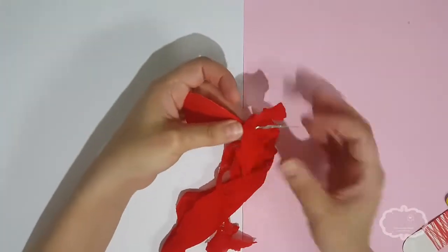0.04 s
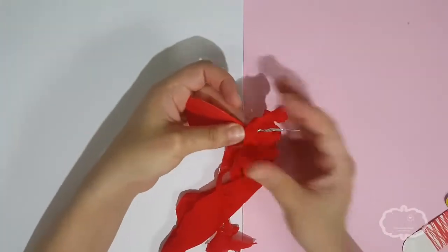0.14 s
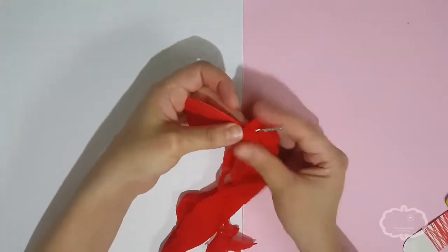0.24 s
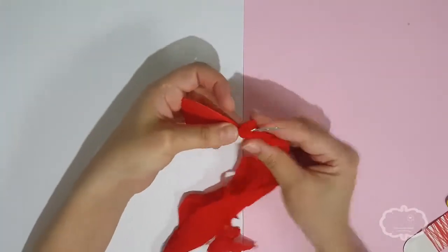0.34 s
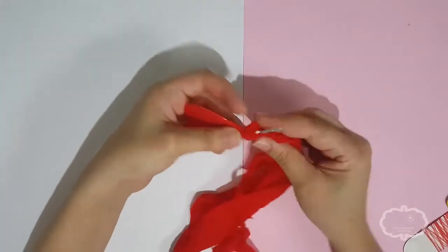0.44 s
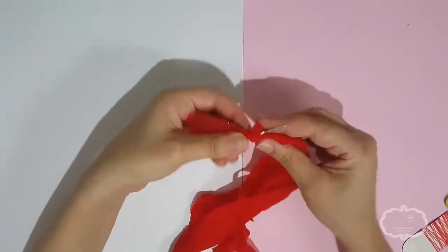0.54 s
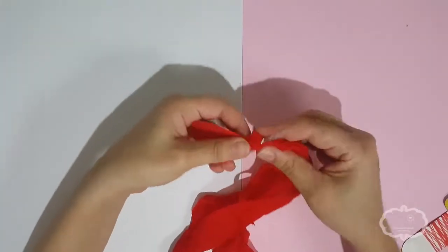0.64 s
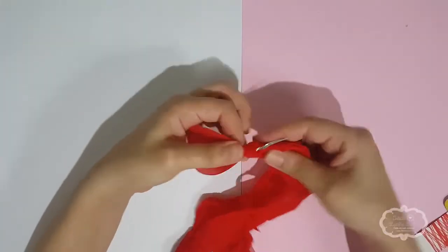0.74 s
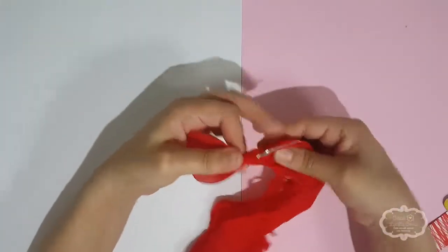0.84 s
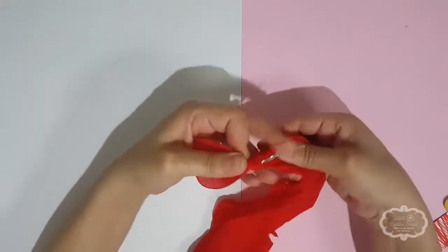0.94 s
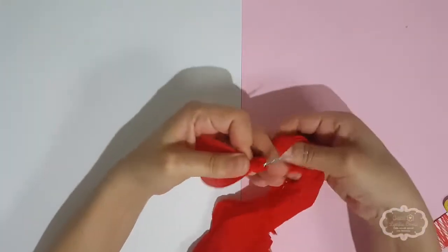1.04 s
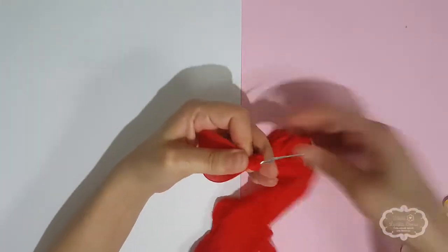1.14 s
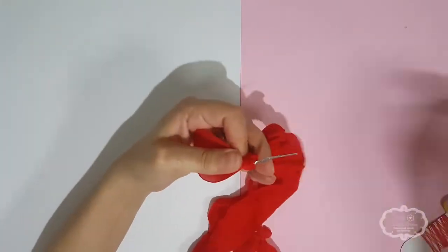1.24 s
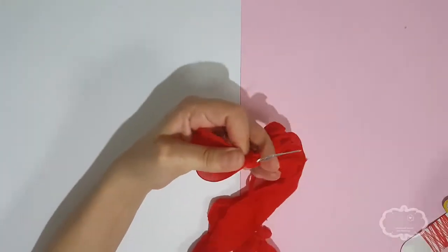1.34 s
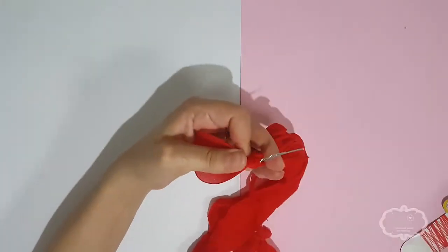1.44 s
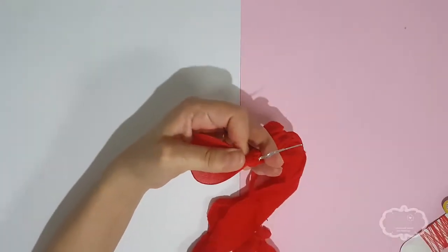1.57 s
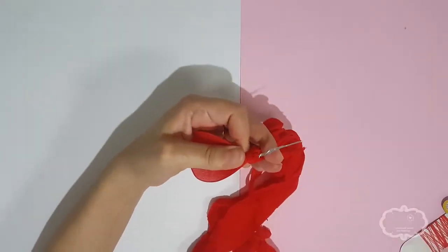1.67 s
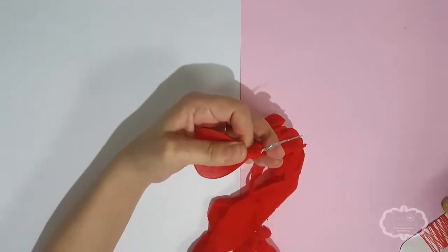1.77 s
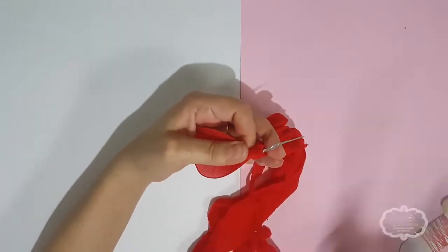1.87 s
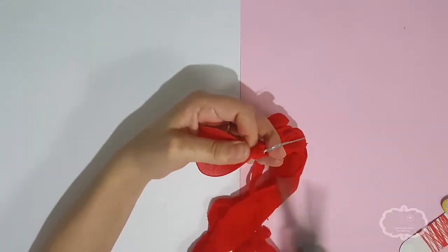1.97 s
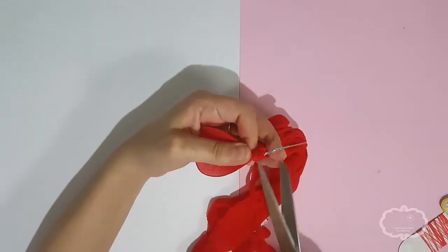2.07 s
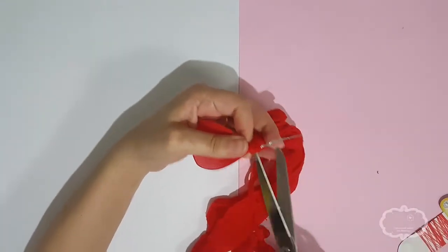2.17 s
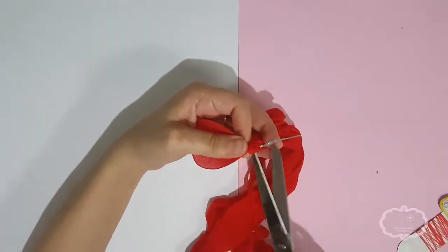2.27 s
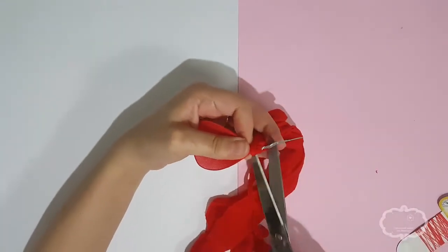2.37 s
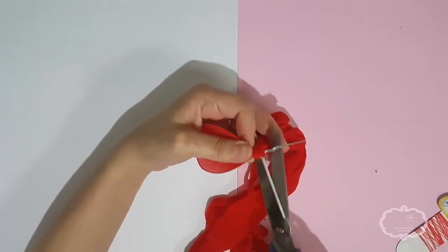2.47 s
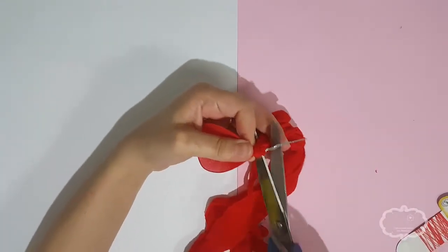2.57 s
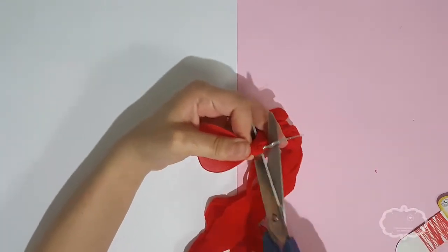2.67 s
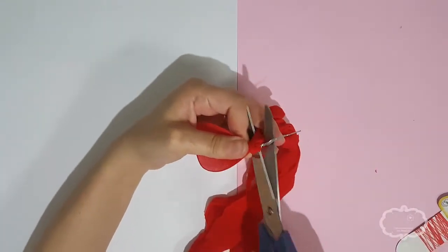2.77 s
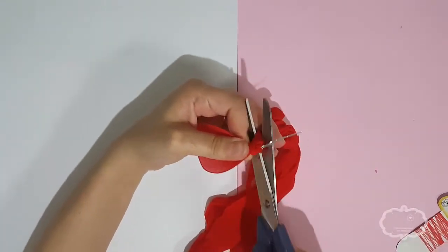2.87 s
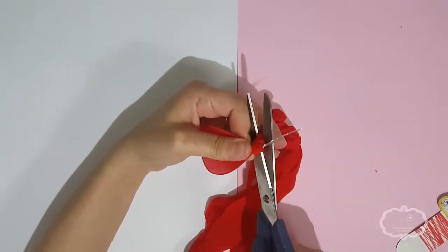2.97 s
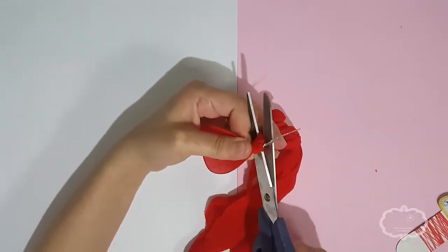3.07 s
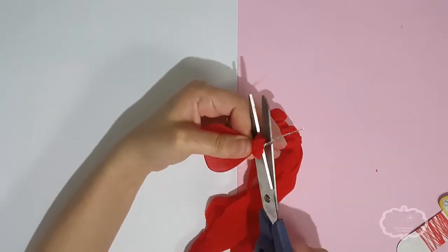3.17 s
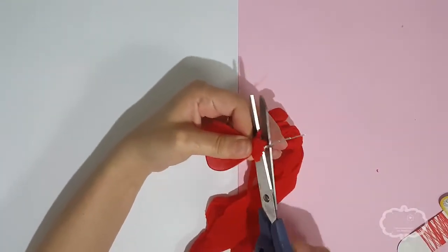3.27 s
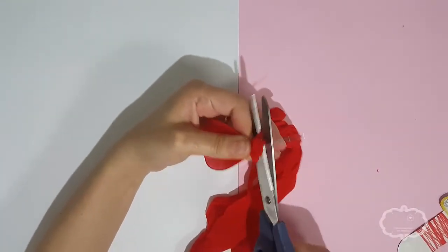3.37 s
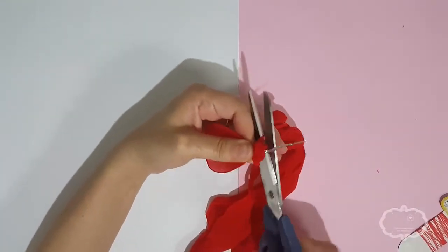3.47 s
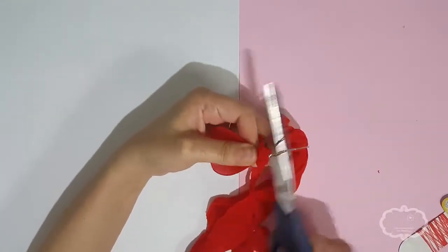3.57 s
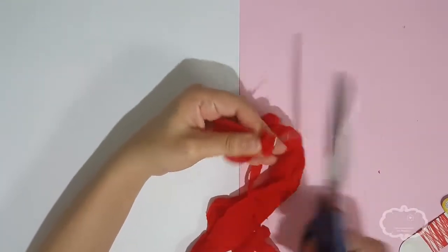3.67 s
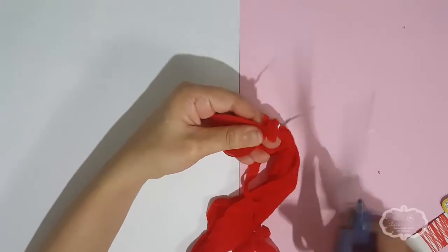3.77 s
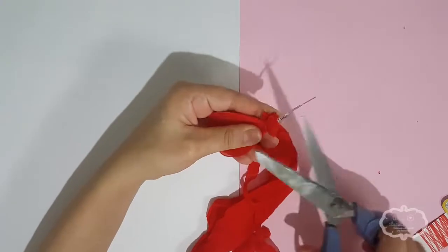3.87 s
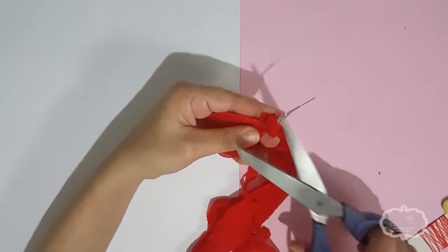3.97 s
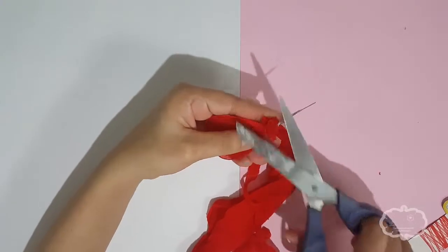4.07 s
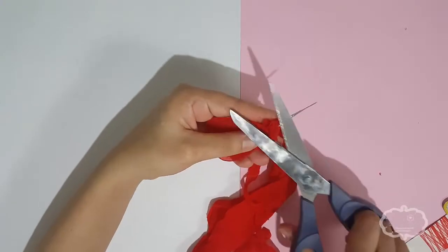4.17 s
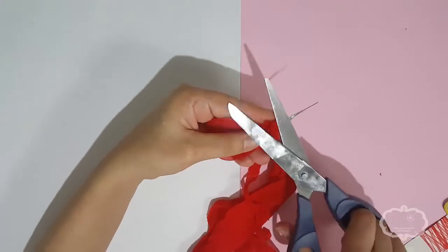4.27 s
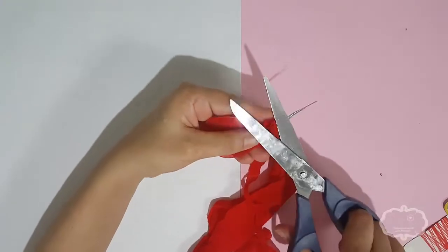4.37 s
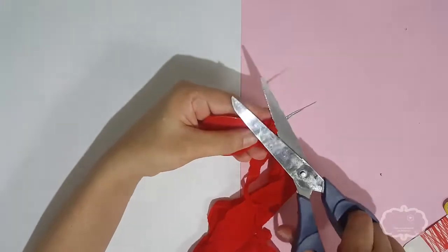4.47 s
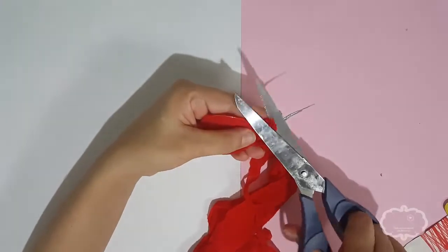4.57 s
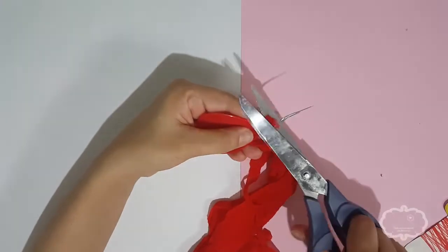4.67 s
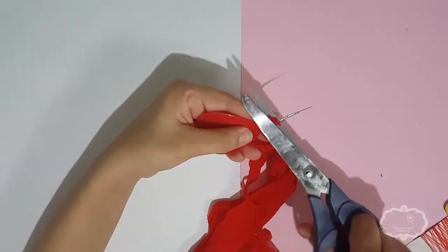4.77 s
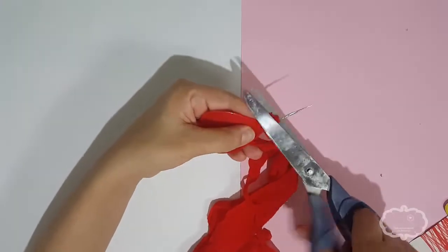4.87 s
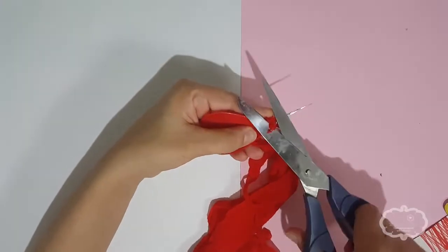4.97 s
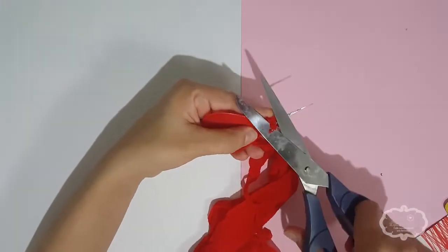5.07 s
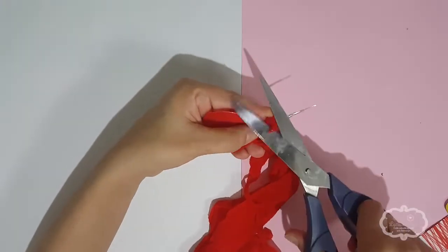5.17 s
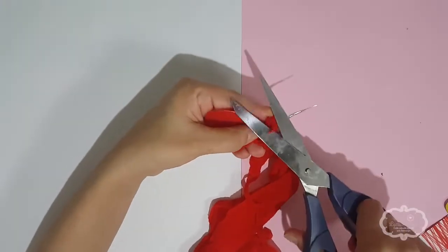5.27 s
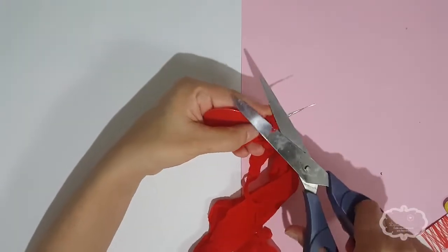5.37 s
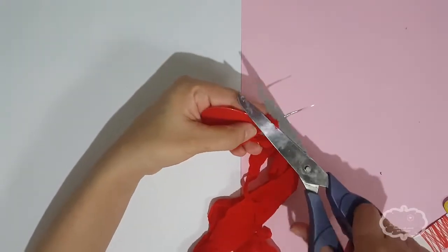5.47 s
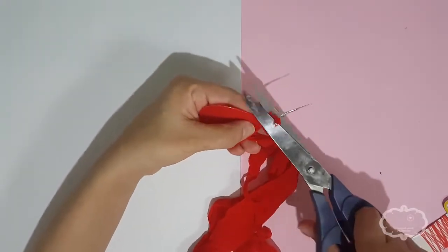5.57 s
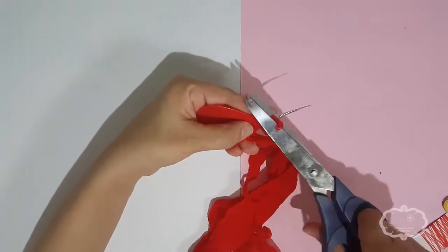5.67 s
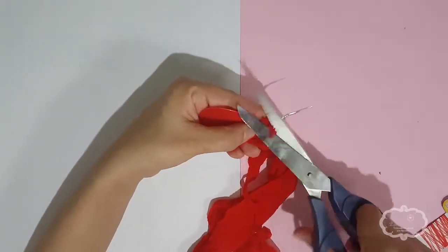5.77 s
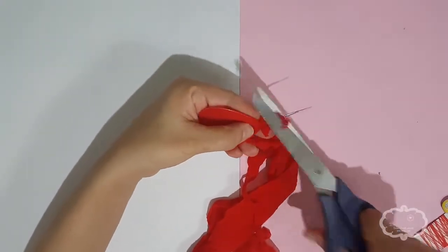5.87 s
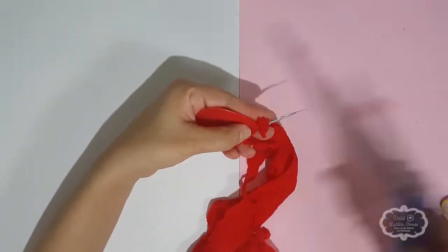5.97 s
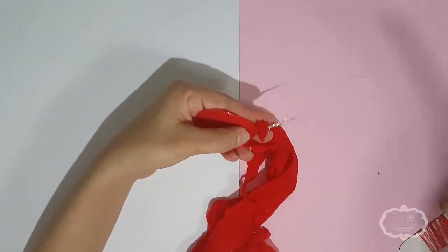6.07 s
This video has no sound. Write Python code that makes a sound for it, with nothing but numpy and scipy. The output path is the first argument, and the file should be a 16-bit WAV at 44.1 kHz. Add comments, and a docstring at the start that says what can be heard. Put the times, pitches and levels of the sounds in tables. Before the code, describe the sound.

Dull table knocks and a sharp metal clack, then scattered scissor snips in softly rustling fabric over a low room hum.

```python
"""Steel scissors on a craft table in a small hard room: picked up with dull knocks on the table top, they click,
scrape and snap shut through cloth. Cloth rustles in the hands; a low hum and rumble waver under the room's hiss."""
import sys
import numpy as np
from scipy import signal
from scipy.fft import rfft, irfft, next_fast_len
from scipy.io import wavfile
from scipy.ndimage import uniform_filter1d, map_coordinates

SR = 44100
rng = np.random.default_rng(int(sys.argv[2]) if len(sys.argv) > 2 else 0)


def master(y):
    """Save y as 16-bit WAV."""
    cut = np.clip(np.atleast_2d(y).T, -1, 1)
    pcm = np.round(cut * 32767)  # scale
    wavfile.write(sys.argv[1], SR, pcm.astype(np.int16))


N = 270487

# contacts of the steel: (s, peak dB, handle Hz, handle dB, pivot Hz, pivot dB, blade Hz, blade dB,
# tip Hz, tip dB, crack dB, left-right dB, room dB)
CLICKS = [(0.775, -40.5, 1078, -15, 2164, -4, 4390, -26, 12100, -34, -20.5, -2.5, -6.5),
          (1.688, 1, 1212, -29, 2512, -10, 4430, -15, 7774, -11, -7, 1, -2.5),
          (1.447, -40, 1560, -25, 2270, -17, 6340, -8.5, 7960, -22, -20.5, -4.5, -8),
          (1.843, -25.5, 1732, -33.5, 2409, -11, 4488, -10, 12420, -15.5, -3.5, 0, 9),
          (1.857, -23.5, 1701, -15, 2524, -9, 4790, -14, 9860, -12, -4, 4, 5.5),
          (3.226, -31, 851.1, -39, 2025, -11.5, 3794, -18, 8630, -33.5, -15.5, 3.5, -6.5),
          (3.249, -21, 732, -28, 1948, -5.5, 6300, -34, 10500, -1.5, -30.5, -2, -10.5),
          (3.44, -25.5, 907, -26.5, 2069, -11.5, 6285, -33, 13900, -21, -32.5, 0.5, -8),
          (3.556, -42, 1640, -17.5, 2130, -18, 6410, -37.5, 12270, 0, -37, 10.5, -1),
          (3.564, -34, 1421, -7.5, 2170, -8, 6450, -26, 14600, -29, -33, 3, -0.5),
          (3.6, -38, 1313, -3.5, 2060, -1, 3880, -34, 8740, -20, -23.5, 1, -18.5),
          (3.695, -9.5, 1681, -22, 2142, -4, 6260, -13.5, 7705, -11.5, -12, 9, -7.5),
          (3.75, -26.5, 1355, -7.5, 2180, -27.5, 4090, -14.5, 12380, 0, -21.5, 6.5, -1),
          (4.175, -43, 1300, -19.5, 2310, -12.5, 6200, -17.5, 12200, -24.5, -12, -0.5, -4.5),
          (4.727, -32.5, 1711, -26, 1961, -10.5, 3864, -26.5, 12700, -5, -7, 1.5, -5),
          (4.964, -23, 897, -4, 1857, -13, 4375, -4.5, 12550, -1, -21.5, -2, -18.5),
          (5.602, -30, 1647, -21.5, 1949, -10, 6406, -14, 10520, 1, -10.5, 0.5, -8.5),
          (5.622, -33.5, 656, -9, 2253, -8, 6200, -26, 13600, -18, -11, 2, -2),
          (5.776, -48, 1616, 0.5, 1980, -6, 3870, -31, 8830, -21, -30, -3, -4),
          (5.792, -20, 1680, -8.5, 1880, -21, 4300, -20, 8899, -1.5, -28.5, -4.5, -28.5),
          (5.799, -26.5, 1113, -3.5, 2093, -3.5, 3850, -12, 8950, 0.5, -18, -4.5, -25),
          (5.9988, -3.5, 1531, -12, 2207, -12.5, 3730, -18.5, 8986, -13.5, -12.5, -4, -14),
          (5.997, -1.5, 1441, -17.5, 2504, -14, 3730, -26, 8720, -14.5, -10.5, -2, 0),
          (6.014, -23, 1132, -9.5, 2081, -2, 5070, -9, 8060, -21, 5, 8.5, 2),
          (6.087, -18, 769.4, -12, 2336, -22, 6400, -22.5, 12700, -4.5, -7.5, -5, 1.5)]
# the scissors' modes, damped by the hand, by part: (Hz, dB, t60 s)
PIVOT = [(1870, 4.5, 0.006), (2125.3, 6.5, 0.01062), (2324, 6, 0.0091), (2753, 2.5, .008)]
BLADE = [(3870, 0, .007), (4400, 0, .004), (5070, 0, .007), (6300, 0, .005)]  # fixed
TIP = [(7911, -1, 0.0021), (8738, 2.5, 0.0049), (10666, -2, 0.0018), (12036, 0.5, 0.001716), (13270, -1.5, 0.0026), (16400, -10.5, 0.002)]
# strokes of the blades on each other and through cloth:
# (s of the peak, rise s, fall s, handle dB, lower pivot dB, upper pivot dB, edge dB, singing dB)
SLIDES = [(1.16, 0.0447, 0.066, -65.5, -59, -61, -75.5, -78.5),
          (1.246, 0.075, 0.048, -87.5, -84.5, -85, -77, -68.5),
          (1.7, .008, 0.123, -32, -38, -25.5, -28.5, -52.5),
          (1.864, 0.02126, 0.0877, -42.5, -62.5, -30, -28.5, -55.5),
          (3.23, 0.1072, 0.0123, -78, -48.5, -49.5, -57.5, -57),
          (3.245, 0.0062, 0.0162, -76, -49.5, -42, -52.5, -70.5),
          (3.262, .01, 0.0745, -76, -60, -60, -50, -60.5),
          (3.438, 0.0195, 0.0066, -66.5, -53, -71, -66, -75.5),
          (3.564, 0.0477, 0.078, -55.5, -41.5, -55.5, -55.5, -71),
          (3.692, 0.0156, .01, -51.5, -44.5, -53.5, -52.5, -67.5),
          (3.706, 0.0053, 0.0767, -50, -29, -37.5, -31, -47.5),
          (3.751, 0.0547, 0.1128, -41, -37, -33.5, -31.5, -55.5),
          (4.73, 0.0066, 0.0247, -64.5, -51, -59, -51.5, -54),
          (4.962, 0.019, 0.0072, -54.5, -42, -65, -45, -63.5),
          (4.976, 0.0071, 0.095, -63, -70.5, -54.5, -52, -60.5),
          (5.598, 0.12, 0.015, -66, -56, -64.5, -61, -73),
          (5.605, .008, 0.0206, -68.5, -51, -60.5, -47, -60.5),
          (5.79, 0.0091, 0.012, -65.5, -50, -75, -49, -41),
          (5.812, 0.041, 0.0608, -43, -35, -48.5, -45.5, -50.5),
          (5.915, 0.0652, 0.091, -50.5, -36, -46.5, -49, -63.5),
          (5.993, 0.0152, 0.0102, -34, -40, -58.5, -68.5, -69),
          (6.006, 0.0155, 0.119, -39, -44, -32, -34.5, -57.5),
          (6.096, 0.0127, 0.0554, -40, -42, -60.5, -42, -50)]
# knocks on the table: (s, peak dB, boom dB, board dB, panel dB, clack dB, length ms, room dB)
KNOCKS = [(1.424, -8, -13.5, -15.5, -21.5, -11, 2.22, 1.5), (1.446, -15, -2, -13.5, -23.5, -3, 2.554, 0),
          (1.468, -12, -22.5, -11.5, -18.5, -4, 0.375, 0), (1.484, -22.5, -21.5, -11, -32, -16, 1.2, -3.5),
          (1.595, -28, -11.5, -5.5, -28, -13, 4.66, -1.5), (1.621, -26, -6, -12.5, -10.5, -25.5, 4.2, -6.5), (1.63, -9.5, -16, -16, -2, -12, 2.2, 1), (1.66, -14.5, -6.5, -8, -11.5, -5, 2.36, 3.5),
          (1.689, -15, -21, -20, -23.5, -7, 4.18, 3)]
BOOM = [(89.76, -1.5, 0.18), (122, 1, 0.15)]  # table modes: (Hz, dB, t60 s)
BOARD = [(184.8, 0, 0.12), (305.8, -5, 0.14), (352, -6, 0.15)]
CLACK = [(410, -2, .016), (481, -0.5, .016), (560, 0.5, .014), (660, 0.5, .014), (735, -1, .012), (810, -2.5, .011), (920, -4, .01),
         (1040, -4, .008), (1257, -4, .008), (1430, -7, .007), (1618, -8, .006), (1903, -10, .006), (2150, -8.5, .008)]  # fixed
LOWS = [(0.0, -67, -53), (0.36, -49, -47.5), (0.39, -57.5, -64.5), (0.53, -55, -48.5), (0.65, -52, -54), (0.77, -58.5, -45.5),
        (0.94, -52.5, -47), (1.38, -50, -58), (1.43, -55.5, -50.5), (2.01, -56.5, -59.5), (2.24, -53, -52.5), (2.42, -58.5, -58.5),
        (3.09, -60.5, -43.5), (3.23, -57.5, -62), (4.28, -57.5, -46), (4.59, -60, -61.5), (5.16, -61, -48), (5.39, -55, -61),
        (5.86, -67.5, -55), (6.13, -74, -49)]  # (s, rumble dB, hum dB)
# throbs of a rough drone: (s of the peak, rise s, fall s, dB)
DRONE = [(.03, 0.116, 0.074, -37), (.096, 0.0426, 0.037, -31), (.16, 0.131, 0.153, -33), (.3, 0.112, 0.049, -53.5), (.514, 0.33, 0.332, -48),
         (.9, 0.477, 0.092, -56), (1.2, 0.96, 0.14, -56)]
DRONE_LOW, DRONE_UP = [(179.75, 40.9, 14.5), (297, 160, 2.5)], [(518, 37.3, 1.7), (779, 214, 3.27)]  # (Hz, width Hz, dB)
# brushes of the cloth: (s of the peak, rise s, fall s, dB)
RUSTLE = [(.236, .06, 0.063, -61), (.456, 0.165, 0.29, -64.5), (.88, 0.29, 0.354, -63), (1.15, 0.042, 0.1636, -64), (1.246, 0.081, 0.099, -64),
          (1.445, 0.0775, 0.149, -55), (1.631, 0.103, 1, -58.5), (2.55, 0.11, 0.043, -72.5), (2.952, 0.25, 0.129, -67),
          (4.66, 0.112, 0.49, -65.5), (4.862, 0.02, 0.032, -63.5)]
CLOTH = [(880, -26), (1500, -1.5), (1720, -6), (2780, -5.5), (3910, -9), (4480, -9.5), (6010, -8), (12500, -16),
         (15500, -37)]  # (Hz, dB per Hz)
AIR = [(0, -51), (1.2, -55), (2.1, -58), (3.5, -55.5), (4.4, -55.5), (4.9, -55), (6.13, -52.5)]  # room hiss: (s, dB)
HISS = [(59, -20.5), (100, -2.5), (153, -6.5), (182, -11.5), (256, -10.5), (303, -19), (383, -18), (426, -17.5), (653, -19.5),
        (1210, -27.5), (1700, -30.5), (2250, -28), (3200, -36), (5870, -41.5), (12500, -42), (16400, -50)]  # (Hz, dB per Hz)
ALIKE = [(60, .97), (200, .95), (550, .45), (1650, .08), (15000, .05)]  # (Hz, left-right likeness), fixed
ROOM = [(100, 0.709), (500, 0.291), (2200, 0.405), (6000, 0.33), (10000, 0.287), (14500, 0.12)]  # (Hz, t60 s)
TOP_HZ = 16500  # fixed
PANEL = [(254, 0, .13)]  # fixed
ROOM_ALIKE = [(200, .98), (600, .85), (1200, .1), (4000, -.15)]  # (Hz, left-right likeness of the walls' answer), fixed
MICROPHONE = [(12000, 0), (15500, -0.5), (16400, -24)]  # (Hz, dB)
HUSH_HZ = 71  # the table is too small to radiate below this
ROOM_COLOUR = [(100, -13.5), (400, 1), (900, -3.5), (2200, -1.5), (4200, -2.5), (7000, 0.5), (14000, -7.5)]  # (Hz, dB)
CLICK_MS, HARDENS = 0.965, 0.113  # length of a steel contact at -23 dB; dB shorter for each dB harder
NEAR_DB = 9  # the table's low modes reach the microphone mostly direct; fixed
SPOT = .05  # each knock lands elsewhere and shifts the clack by this share; fixed
CLICK_TAIL_SHARE = 0.714  # share of the room's decay time in the answer to each steel contact
SWELL_DB = 30  # a swell climbs this much in its rise time and sinks as much in its fall time; fixed
HUM_HZ, DRIFT_HZ, HUM_WAVER_DB = [64, 92, 122, 186, 252], 3, 2.5  # bands of the hum, their wander; fixed
CLIMB = [(.45, 29.12, -67), (.7, 30.05, -48), (.9, 32.15, -45.5), (1.05, 34.9, -59.5), (1.3, 38.54, -50), (1.901, 44.12, -59.5), (2.2, 47.81, -51),
         (2.401, 50.9, -69.5)]  # a deep tone that climbs, perhaps an engine outside: (s, Hz, dB)
UPPER_HUM = [
    [(0.25, -60, -56.5, -71.5, -61.5), (0.502, -67.5, -66.5, -41.5, -70.5), (0.598, -75.5, -47.5, -50, -61.5),
     (0.688, -71.5, -67.5, -64, -87.5), (0.746, -59.5, -70.5, -67, -65.5), (0.892, -60.5, -59, -58, -57.5),
     (1.006, -57.5, -62.5, -55.5, -68.5), (1.328, -75.5, -69.5, -78.5, -65), (1.36, -53, -57, -77, -70.5)],
    [(2.05, -78, -80, -76.5, -75), (2.212, -63, -56, -76.5, -73), (2.374, -70.5, -66.5, -91, -60),
     (2.652, -67, -58.5, -67, -87.5), (2.788, -73, -84, -82, -60.5), (3.048, -62, -60.5, -78.5, -89),
     (3.064, -55, -61, -65, -69), (3.662, -73.5, -76, -67.5, -79.5), (4.0, -73, -68.5, -67.5, -81.5)],
    [(4.05, -60.5, -63.5, -78.5, -84), (4.186, -58, -67.5, -55, -65.5), (4.424, -66.5, -65, -69.5, -75.5),
     (4.568, -66, -85, -65.5, -79.5), (4.752, -53, -61, -71, -70), (5.06, -56.5, -53, -62.5, -53.5),
     (5.34, -59, -66.5, -63, -80), (5.848, -57, -61.5, -65.5, -55.5), (5.95, -54, -64.5, -77, -70)],
]  # upper bands of the hum: (s, dB each)
DRONE_UP_DB = -16.5  # upper band under the low one
PRESSED, GRAZING = 2.2, .3  # width of the blades' modes over their struck width, pressed together or barely touching; fixed
# single modes of the steel that sing out after a contact or under a stroke: (s of the peak, rise s, fall s, Hz, dB)
SINGS = [(1.858, 0.0063, 0.022, 13230, -26.5), (1.857, 0.007, 0.0214, 9870, -28.5),
         (1.875, 0.01384, 0.101, 2485, -31.5), (1.88, 0.0185, 0.148, 7870, -39.5), (1.885, 0.04, 0.102, 826.3, -40.5),
         (3.57, 0.024, 0.0535, 2111, -44), (3.599, 0.0364, 0.045, 1403, -49.5), (3.74, 0.069, 0.051, 2184, -32.5), (3.77, 0.039, 0.089, 853, -45),
         (4.862, 0.0163, 0.051, 8800, -63.5), (4.968, 0.0087, 0.0244, 893.5, -40), (4.967, 0.00786, 0.0103, 1830, -28), (4.969, 0.0049, 0.0094, 4660, -42.5), (4.968, 0.0051, .012, 12430, -40.5), (4.98, 0.0114, 0.073, 12480, -49.5),
         (4.982, 0.0098, 0.066, 8990, -58.5), (4.988, 0.0167, 0.074, 2353, -55),
         (5.795, 0.0055, 0.043, 8805, -38), (5.795, 0.0098, 0.02, 4900, -42), (5.798, 0.0097, 0.05, 3940, -49.5), (5.803, 0.012, 0.041, 1110, -47.5),
         (5.885, 0.024, 0.031, 6170, -49.5), (5.913, 0.024, 0.0185, 8850, -33.5), (5.915, 0.0254, 0.023, 3820, -48), (5.915, 0.032, 0.0254, 4900, -51),
         (5.915, 0.035, 0.035, 13400, -49), (6.03, 0.026, 0.112, 2119, -33), (6.02, 0.024, 0.098, 8400, -36.5), (6.096, 0.0136, 0.032, 824, -44.5),
         (6.128, 0.034, 0.024, 619.6, -39.5)]
WAVER, WAVER_HZ = .04, 45  # a singing mode's width: share of its pitch, and at least; fixed
SMEAR_S, SMEAR_RATE = 8e-5, 450  # moving hands and blades shake the path to the walls: delay s, knots a second; fixed
GRIP = 1.5  # the hand damps a singing mode ever faster; fixed


def amp(db):
    return 10 ** (np.asarray(db) / 20)


def unit(x):
    return x / np.sqrt(np.mean(x ** 2) + 1e-20)


def along(points, hz):
    """(Hz, value) points on a log axis."""
    f, v = np.transpose(points)
    return np.interp(np.log(hz + 1), np.log(f + 1), v)


def gains(rows):
    """One gain per sample for each dB column."""
    s, *cols = np.transpose(rows)
    return amp([np.interp(np.arange(N) / SR, s, c) for c in cols])


def wobble(rate):
    """A smooth random curve, rate knots a second."""
    return map_coordinates(rng.standard_normal(int(N * rate / SR) + 4), [np.arange(N) * rate / SR])


def filtered(x, response):
    """x times a complex response of frequency."""
    m = next_fast_len(N + SR // 2)
    return irfft(rfft(x, m) * response(np.fft.rfftfreq(m, 1 / SR)), m)[..., :N]


def peaks(rows):
    """The response of resonances (Hz, width Hz, dB)."""
    return lambda f: sum((-1) ** k * amp(db) * 1j * f * w / (c * c - f * f + 1j * f * w) for k, (c, w, db) in enumerate(rows))


def widths(modes):
    """Modes (Hz, dB, t60) as resonances."""
    return [(hz, np.log(1000) / np.pi / t60, db) for hz, db, t60 in modes]


def rush(response, alike=ALIKE):
    """Stereo noise of rms 1."""
    turn = lambda hz: np.arccos(np.clip(along(alike, hz), -1, 1)) / 2
    mid, side = filtered(rng.standard_normal((2, N)), lambda hz: response(hz) * [np.cos(turn(hz)), np.sin(turn(hz))])
    return unit(np.array([mid + side, mid - side]))


def ring(parts, length_ms, lasts, scatter_db):
    """A short rough contact rings each (modes, dB, likeness) part; unlike parts differ between the two ports."""
    t = np.arange(int(lasts * SR)) / SR
    u = t[:SR // 25] * 1000 / max(length_ms, .2)
    out = 0
    for modes, db, alike in parts:
        a, b = rng.standard_normal((2, len(u)))
        chatter = np.array([a, alike * a + np.sqrt(1 - min(alike, 1) ** 2) * b])
        hz, level, t60 = np.transpose(modes)[:, :, None]
        phase = rng.uniform(0, 2 * np.pi, hz.shape) + rng.choice([-1, 1], hz.shape) * [0, np.arccos(min(alike, 1))]
        in_step = np.clip((hz * t60 - 3) / 20, 0, .45)  # long-ringing modes feed back on the contact; fixed
        swing = in_step[:, None] * np.cos(2 * np.pi * hz[:, None] * t[:len(u)] + phase[:, :, None])
        force = u * u * np.exp(-u) * (chatter + swing)
        free = amp(-60 * t / t60) * np.sin(2 * np.pi * hz * t)
        each = signal.fftconvolve(free[:, None], force, axes=2)[..., :len(t)]
        each = each / np.abs(each).max(axis=(1, 2), keepdims=True)
        struck = np.sum(amp(level + scatter_db * rng.standard_normal(level.shape))[:, None] * each, axis=0)
        out = out + amp(db) * struck / np.abs(struck).max()
    return out


def tail(lasting, gap=.0035, rise=0.0014, bend=0.958):
    """One stereo answer of the room: silent until the first wall, each frequency dying at its own speed, a
    little slower late on."""
    hz, t, z = signal.stft(rng.standard_normal((2, SR // 3)), SR, nperseg=256)
    turn = np.arccos(np.clip(along(ROOM_ALIKE, hz), -1, 1))[:, None] / 2
    fade_db = along(ROOM_COLOUR, hz)[:, None] - 60 * (t / along(ROOM, hz)[:, None] / np.clip(lasting, .3, 1.5)) ** bend
    mid, side = z[0] * np.cos(turn), z[1] * np.sin(turn)
    x = signal.istft(np.array([mid + side, mid - side]) * amp(fade_db), SR, nperseg=256)[1]
    x = x * (1 - np.exp(-np.arange(x.shape[1]) / SR / rise))
    return np.pad(x, ((0, 0), (int(gap * SR), 0))) / np.linalg.norm(x[0])


def add(out, s, sound, pan_db, room_db, lasting=1, smear_s=0):
    """Puts a sound and its own room answer at time s."""
    wet = amp(room_db) * signal.fftconvolve(sound[:1], tail(lasting), axes=1)
    if smear_s:
        k = np.arange(wet.shape[1])
        shake = map_coordinates(rng.standard_normal(len(k) * SMEAR_RATE // SR + 4), [k * SMEAR_RATE / SR])
        wet = np.array([map_coordinates(x, [k + smear_s * SR * shake]) for x in wet])
    wet[:, :sound.shape[1]] += sound * amp([[pan_db / 2], [-pan_db / 2]])
    k = round(s * SR)
    out[:, k:k + wet.shape[1]] += wet[:, :N - k]


def clicks():
    """Every contact rings handle, pivot, blades and tips in its own shares, over a toneless crack.
    The grip sets the handle's pitch."""
    out = np.zeros((2, N))
    for s, db, hz, handle, pivot_hz, pivot, blade_hz, blade, tip_hz, tip, crack, pan_db, room_db in CLICKS:
        steel = [(favoured(PIVOT, pivot_hz), pivot, .5), (favoured(BLADE, blade_hz), blade, .1), (favoured(TIP, tip_hz), tip, .1)]
        parts = steel + [([(hz, 0, .018)], handle, .7), ([(7840, 0, 0.00003)], crack, .1)]
        add(out, s - .0009, amp(db) * ring(parts, CLICK_MS * amp(-HARDENS * (db + 23)), 0.058, scatter_db=3.5), pan_db, room_db, CLICK_TAIL_SHARE, SMEAR_S)
    small = signal.butter(4, 600, "high", fs=SR, output="sos")  # too small a thing to radiate bass; fixed
    return signal.sosfilt(small, out)


def knocks():
    """Soft blows on the table top: too slow a contact to drive much treble."""
    out = np.zeros((2, N))
    for s, db, boom, board, panel, clack, length_ms, room_db in KNOCKS:
        moved = [(hz * (1 + SPOT * rng.standard_normal()), level, t60) for hz, level, t60 in CLACK]
        body = [(BOOM, boom, .99), (BOARD, board, .97), (PANEL, panel, .97)]
        add(out, s - .004, amp(db) * ring(body, length_ms, .4, scatter_db=1), .6, room_db - NEAR_DB)  # fixed
        add(out, s - .004, amp(db) * ring([(moved, clack, .95)], length_ms, .1, scatter_db=1.5), .6, room_db, lasting=.75)  # fixed
    soft = signal.butter(10, 2180, fs=SR, output="sos")  # fixed
    out = signal.sosfilt(signal.butter(2, HUSH_HZ, "high", fs=SR, output="sos"), out)
    return signal.sosfilt(soft, out) + amp(-17.0) * out


def slides():
    """Uneven friction feeds the same modes; much of it arrives by the walls, unlike in both ears."""
    handle, lower, upper, edge, singing = uniform_filter1d(swells(SLIDES), size=200, axis=1)
    grit = amp(1.8 * wobble(160))  # fixed
    low = rush(lambda f: peaks([(850, 300, 0), (1350, 400, 0)])(f) ** 2, ROOM_ALIKE)
    pivot = lower * rush(peaks(widths(PIVOT[:2])), ROOM_ALIKE) + upper * rush(peaks(widths(PIVOT[2:])), ROOM_ALIKE)
    high = lambda wide: rush(peaks([(hz, wide * w, db) for hz, w, db in widths(BLADE + TIP)]), ROOM_ALIKE)
    return grit * (handle * low + pivot + edge * high(PRESSED) + singing * high(GRAZING))


def cloth():
    """Fingers brush the fabric: fine grainy hiss."""
    return swells(RUSTLE)[0] * amp(0.67 * wobble(130)) * rush(lambda hz: amp(along(CLOTH, hz)))


def lows():
    """Rumble, stronger on the right, and a hum whose narrow bands wander and swell each on its own."""
    rumble, hum = gains(LOWS)
    tones = [amp(HUM_WAVER_DB * wobble(7.6)) * np.sin(2 * np.pi * np.cumsum(hz + DRIFT_HZ * wobble(6.4)) / SR) for hz in HUM_HZ]
    deep = rumble * amp([[-4.5], [4.5]]) * rush(lambda f: peaks([(34, 24, 0)])(f) ** 2, [(30, .97)])  # fixed
    band = hum * amp([[-2.5], [2.5]]) * unit(tones[0])
    s, hz, db = np.transpose(CLIMB)
    pitch = np.interp(np.arange(N) / SR, s, hz)
    climb = gains(np.c_[s, db]) * amp([[-4], [4]]) * np.sqrt(2) * np.sin(2 * np.pi * np.cumsum(pitch) / SR)
    return deep + climb + band + np.sum(gains(np.vstack(UPPER_HUM)) * tones[1:], axis=0)


def drone():
    """A rough, throbbing low drone that fades over the first second."""
    level = uniform_filter1d(swells(DRONE)[0], size=600)
    throb = amp(2.87 * wobble(26.31))
    narrow = lambda rows: rush(lambda f: peaks(rows)(f) ** 2, [(200, 0.948)])
    return throb * level * (narrow(DRONE_LOW) + amp(DRONE_UP_DB) * narrow(DRONE_UP))


def air():
    """The steady hiss of room and microphone."""
    return gains(AIR)[0] * amp(0.4 * wobble(2.6)) * rush(lambda hz: amp(along(HISS, hz)))  # fixed


def favoured(modes, hz, more_db=14):
    """The modes near the pitch that this contact point drives best are drawn to it and come out stronger."""
    near = lambda f: np.exp(-(np.log(f / hz) / .07) ** 2)
    return [(f * (hz / f) ** near(f), db + more_db * near(f), t60) for f, db, t60 in modes]


def swells(rows):
    """Gains that climb to each row's levels and sink again: rows (s, rise s, fall s, dB, ..)."""
    out = np.zeros((len(rows[0]) - 3, N))
    for s, rise, fall, *levels_db in rows:
        k = np.arange(max(int((s - 2 * rise) * SR), 0), min(int((s + 2 * fall) * SR), N))
        t = k / SR - s
        out[:, k] += amp(levels_db)[:, None] * amp(-SWELL_DB * np.maximum(-t / rise, t / fall))
    return out


def sings():
    """Each singing mode is a wavering tone, unlike in both ears."""
    out = np.zeros((2, N))
    for s, rise, fall, hz, db in SINGS:
        k = np.arange(int((s - 2 * rise) * SR), min(int((s + 2 * fall) * SR), N))
        t, rate = k / SR - s, WAVER_HZ + WAVER * hz
        at = (t - t[0]) * 2 * rate
        a, b, c, d = [map_coordinates(rng.standard_normal(int(at[-1]) + 4), [at]) for _ in "abcd"]
        tone = np.imag((.4 + np.array([a + 1j * b, c + 1j * d]) / 2) * np.exp(2j * np.pi * hz * t + [[0], [2j]]))  # fixed
        out[:, k] += tone * amp(db - SWELL_DB * np.maximum(-t / rise, t / fall) ** GRIP)
    return out


def scene():
    return clicks() + sings() + knocks() + slides() + cloth() + lows() + drone() + air()


def record(dry):
    """The microphone fades at the top; the camera keeps nothing above its band limit."""
    return filtered(dry, lambda hz: amp(along(MICROPHONE, hz)) * (hz < TOP_HZ))


dry = scene()
out = record(dry)
master(out)
```